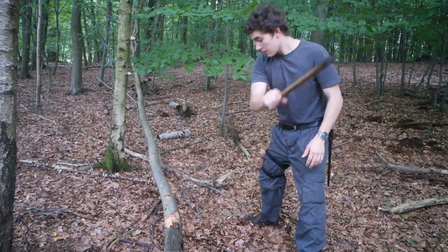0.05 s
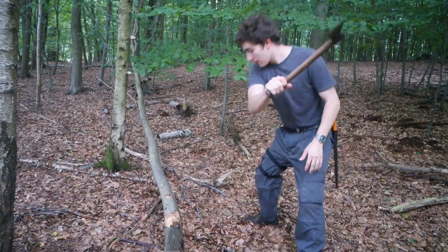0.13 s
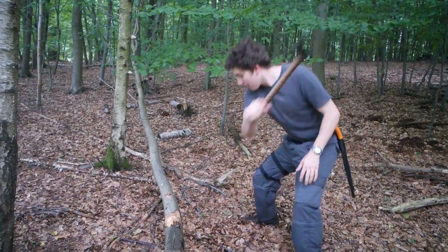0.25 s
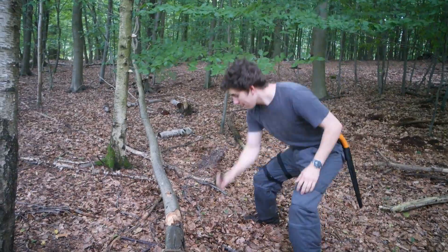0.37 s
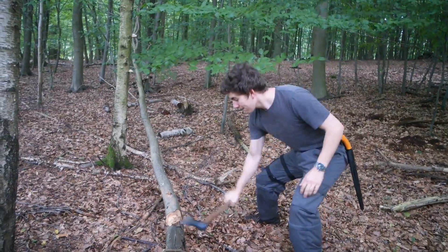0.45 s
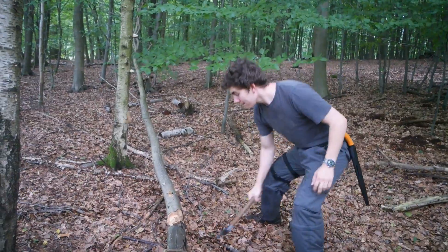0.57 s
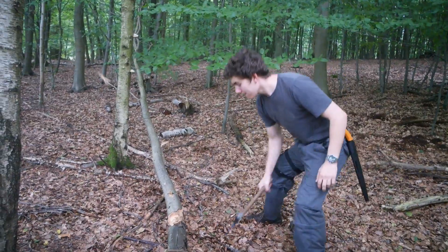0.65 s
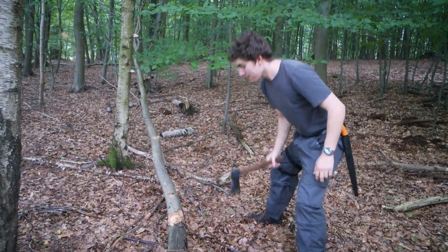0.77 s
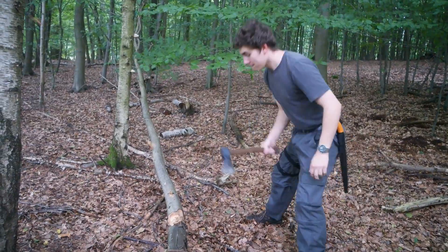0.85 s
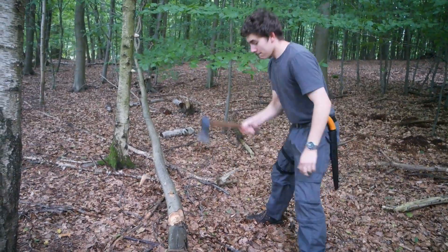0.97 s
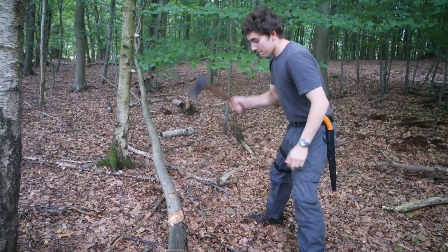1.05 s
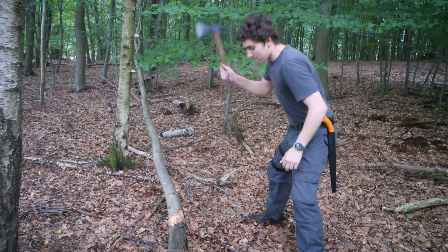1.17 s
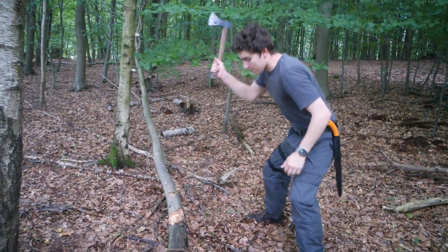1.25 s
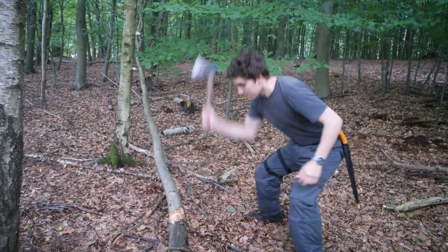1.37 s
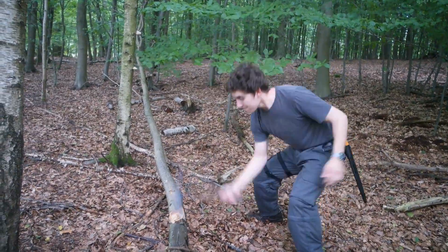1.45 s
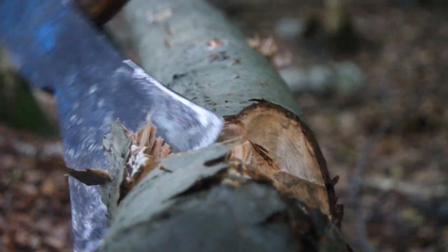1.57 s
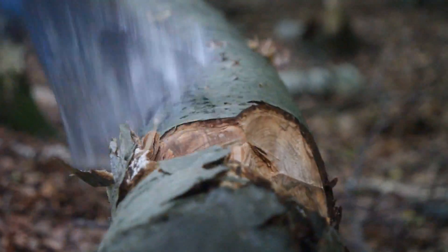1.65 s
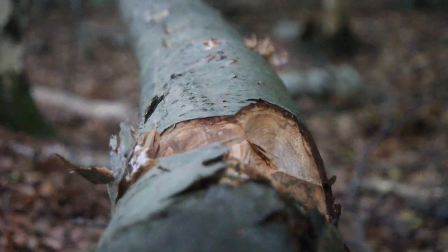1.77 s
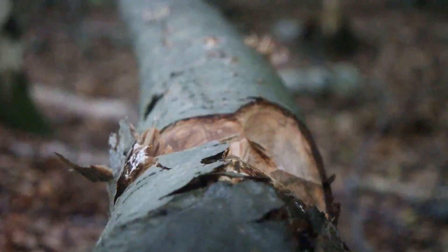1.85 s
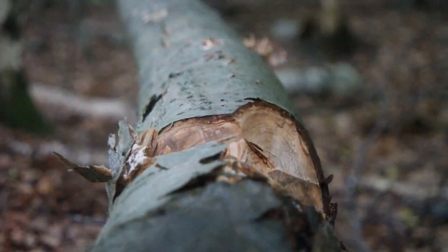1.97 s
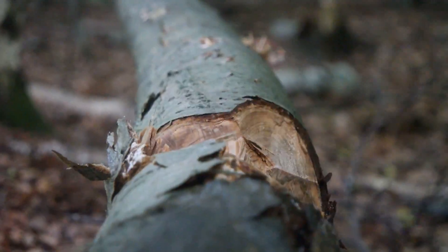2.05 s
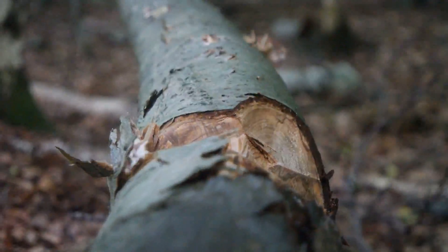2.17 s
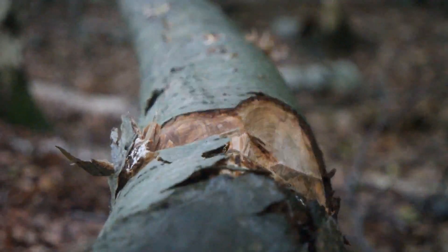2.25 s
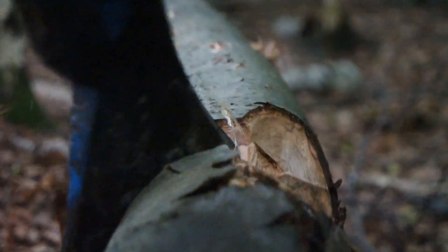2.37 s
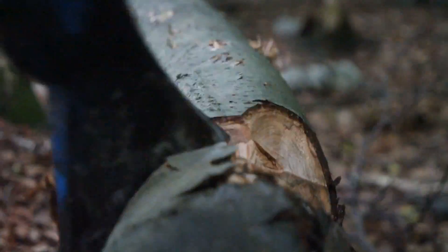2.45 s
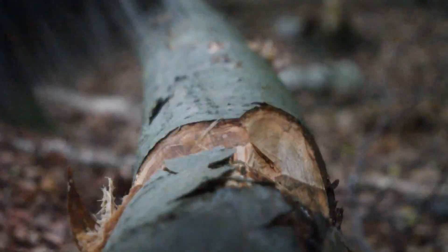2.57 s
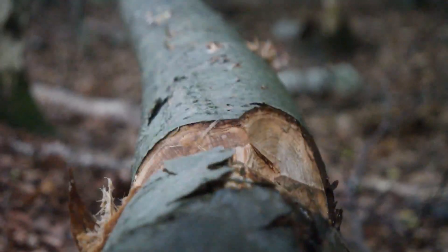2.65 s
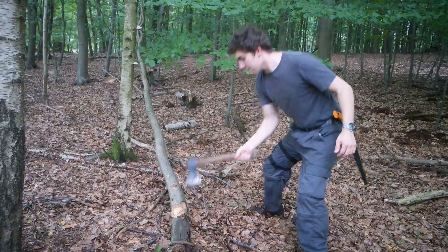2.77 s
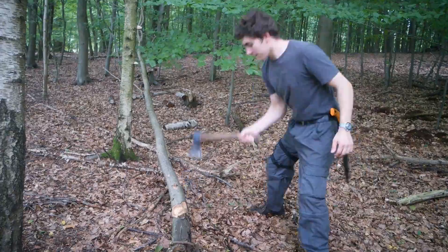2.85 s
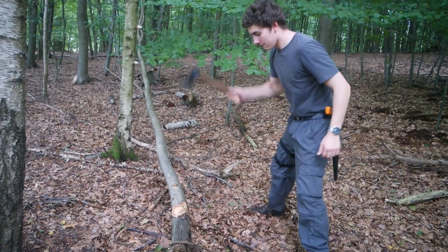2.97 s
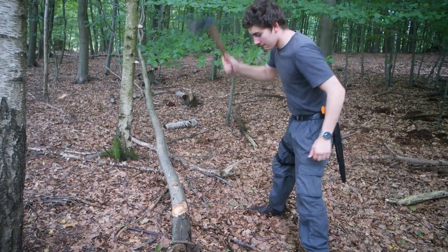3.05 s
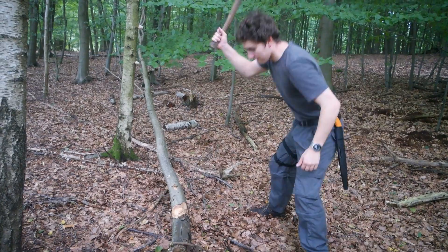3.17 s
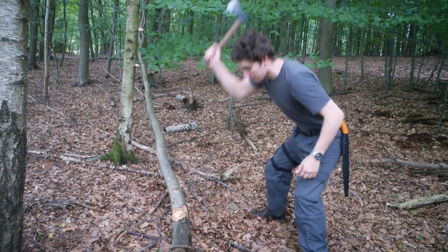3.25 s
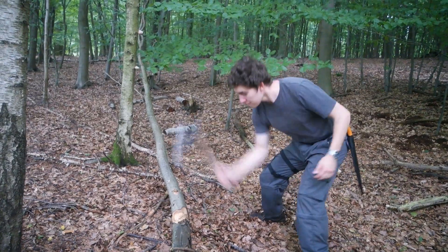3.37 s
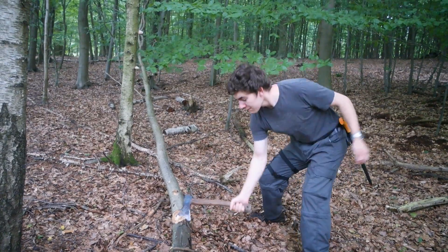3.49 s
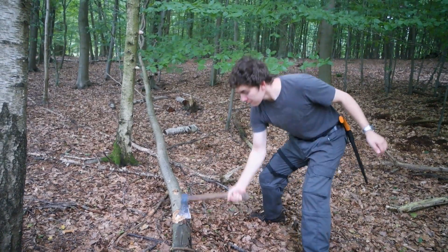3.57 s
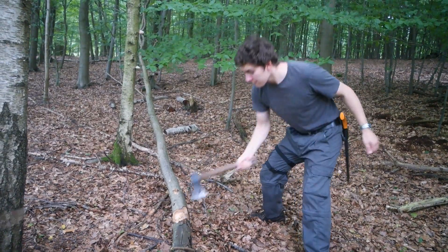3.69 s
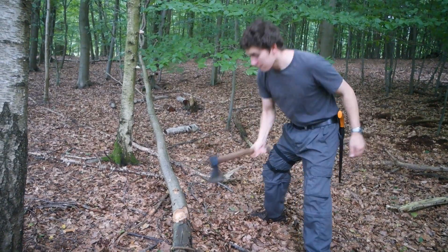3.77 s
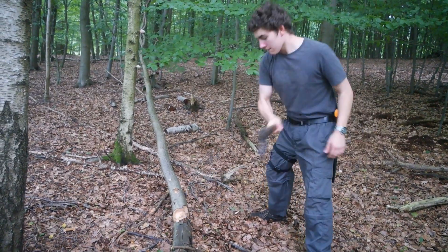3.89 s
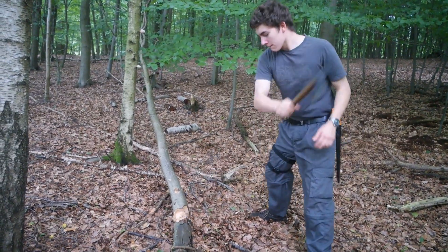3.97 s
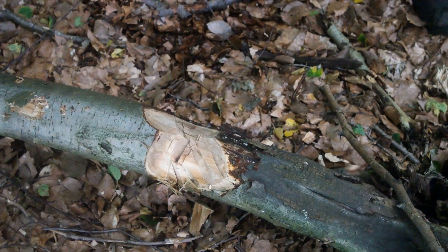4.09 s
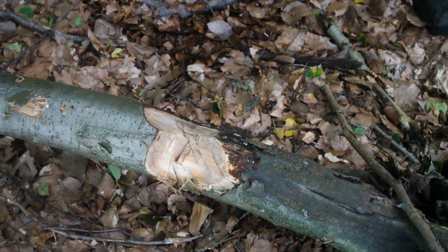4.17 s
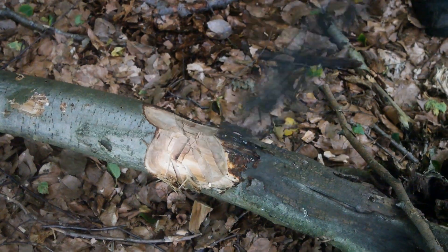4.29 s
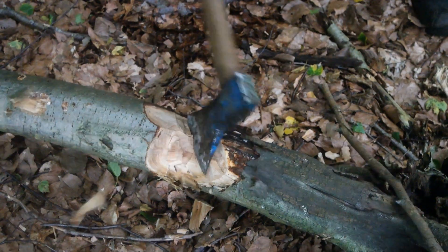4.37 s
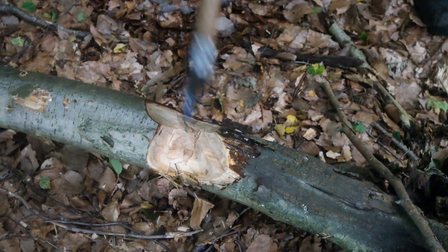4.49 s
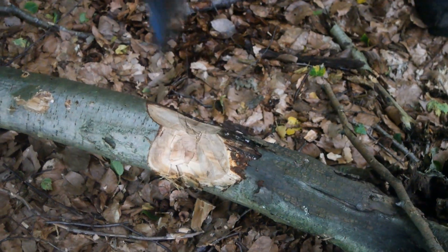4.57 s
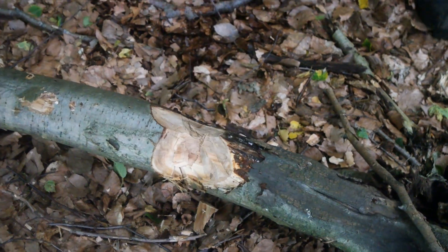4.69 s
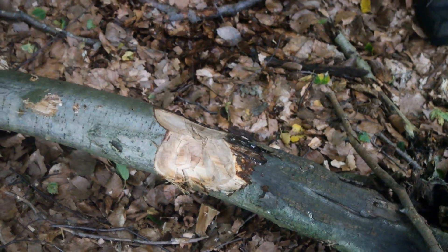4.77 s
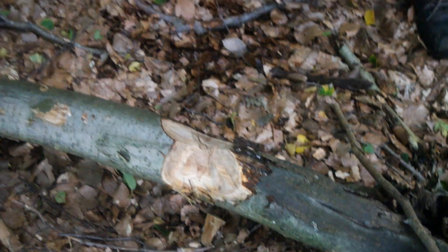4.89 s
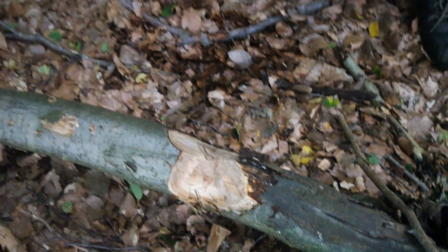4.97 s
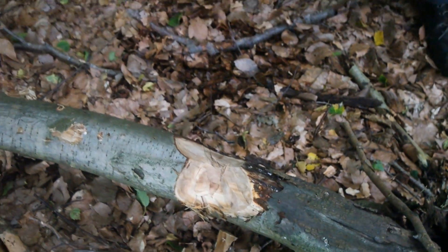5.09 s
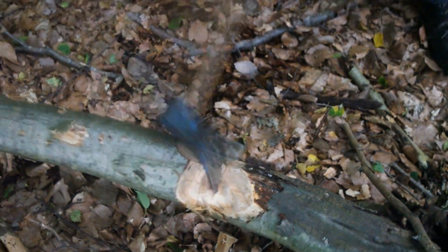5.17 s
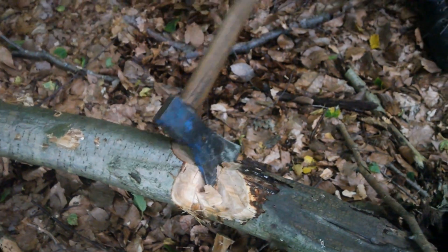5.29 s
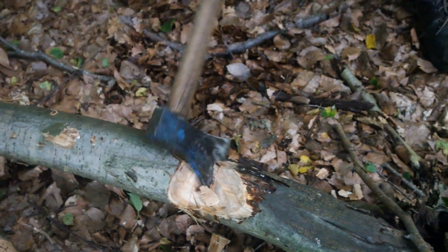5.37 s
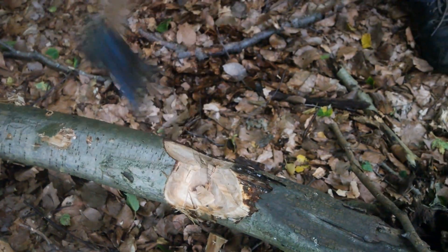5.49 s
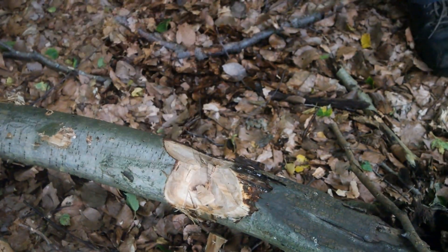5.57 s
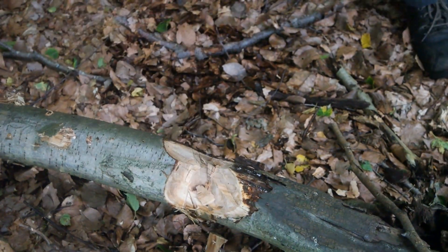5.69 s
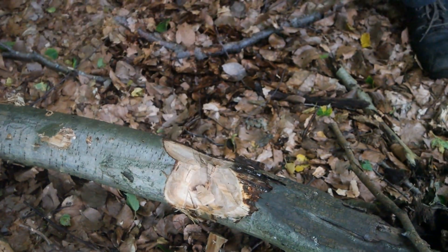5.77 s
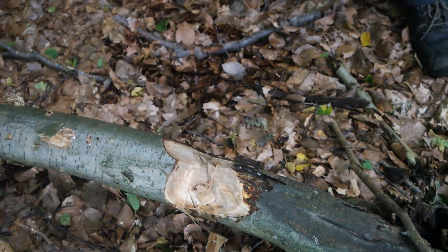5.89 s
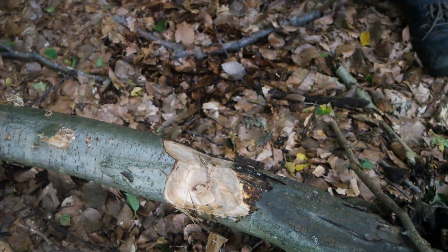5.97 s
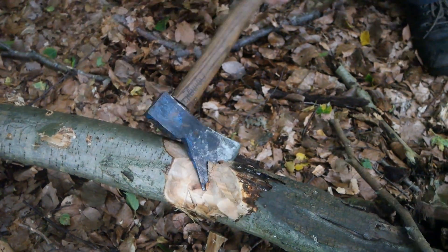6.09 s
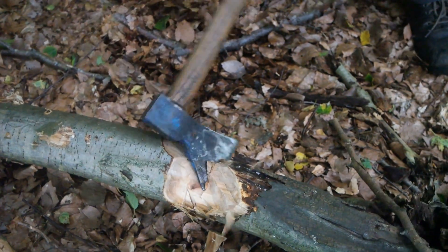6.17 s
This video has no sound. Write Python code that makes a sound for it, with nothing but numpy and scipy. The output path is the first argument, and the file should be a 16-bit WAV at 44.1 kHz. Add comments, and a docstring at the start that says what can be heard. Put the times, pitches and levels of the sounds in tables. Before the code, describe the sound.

A dry branch breaks close by at the very start, a quick cluster of snaps and crackle lasting about a tenth of a second. A hatchet then chops into a fallen log seven times, at about 0.6, 1.6, 2.6, 3.6, 4.5, 5.3 and 6.2 seconds, slightly right of centre. Each blow is a loud, short, splintering knock with a trace of steel ring, followed by a brief echo off the surrounding trunks. The last three knock a little deeper. Faint wooden knocks, chips landing on dry leaves and small cloth rustles come between blows, most clearly around 1.6 and 4.5 seconds. Behind is a quiet forest wash of leaves, distant air and thin hiss, rising before each blow and sinking after it. Soft, low wind puffs brush the microphone during the first three seconds. The sound ends right on the last chop.

```python
"""A hatchet bites seven times into a fallen log, heard from a stereo microphone in a quiet wood.
Each blow is a few milliseconds of tearing fibres that ring the steel head and the log; the trunks
around scatter it back. Small wooden knocks follow, chips land on dry leaves, and at the very start
a dry branch cracks close by. Behind are leaves, far air, hiss and a breeze on the microphone ports;
the level of this whole background rises before each blow and sinks after it."""
import sys
import numpy as np
from scipy import signal
from scipy.fft import rfft, irfft
from scipy.io import wavfile

SR = 44100
rng = np.random.default_rng(int(sys.argv[2]) if len(sys.argv) > 2 else 0)


def log_audio(samples):
    """Write samples as a 16-bit WAV file to the path given in sys.argv[1]."""
    # one column per channel
    frames = np.atleast_2d(samples).T
    # limit to full scale, then quantise
    limited = np.clip(frames, -1, 1)
    pcm = np.round(limited * 32767).astype(np.int16)
    wavfile.write(sys.argv[1], SR, pcm)


N = 275184
LOG_PAN_DB = -3   # every pan is left minus right: the log is louder on the right

# modes of the steel head, damped by the wood: f/Hz, level/dB, t60/s
HEAD_MODES = [(1850, 2.5, .012), (2500, -0.5, 0.035), (3000, -3, 0.018), (3570, -0.5, .009),
              (4500, -5, .009), (5100, -10, .009), (6580, -8.5, 0.019)]
def steel_head(push, tearing, t, bite_ms, cutoff_ms=5.3):
    """Tearing fibres shake the head; its ring cuts off just after the bite."""
    shake = push + .055 * tearing
    modes = sum(from_db(db) * rms_one(ring(shake, hz, t60)) * (-1) ** k
                for k, (hz, db, t60) in enumerate(HEAD_MODES))
    return modes * np.exp(-(t * 1000 / (bite_ms + cutoff_ms)) ** 3)


# modes of the fallen log: f/Hz, level/dB, t60/s
LOG_MODES = [(330, -3, .04), (430, 0, .05), (560, -3, .035), (735, 0, .04), (1040, -4, .022),
             (1250, -5, .018), (1900, -6, .016), (2500, -7, .014)]
def log_ring(push):
    """The log rings, its modes balanced differently at every blow."""
    return sum(from_db(db + rng.normal(0, 4)) * ring(push, hz, t60) * (-1) ** k
               for k, (hz, db, t60) in enumerate(LOG_MODES))


# returns along the log: mean delay/s, spread/s, low f/Hz, high f/Hz
LOG_RETURNS = [(.010, .005, 756, 1250), (0.02, .007, 502, 851), (0.022, .007, 370, 516.5)]
def bending_waves(t):
    """Bending waves come back along the log, high ones first, each a swell of noise."""
    for delay, spread, low, high in LOG_RETURNS:
        noise = rng.standard_normal(len(t))
        arrival = delay * rng.uniform(.76, 1.3)
        yield band(noise * np.exp(-((t - arrival) / spread) ** 2), low, high)


# blows at the log: t/s, rms level over the first 5 ms/dB, knock f/Hz, crack f/Hz, bite/ms;
# shares/dB of knock, crack, head, splinters, log ring, each return;
# echo level/dB, echo tilt/(dB per octave), echo emphasis f/Hz
BLOWS = [(0.582, -11.5, 850, 3090, 0.35, -1, -9, -4, -10.5, -27.5, -22, -44, 4, 2800),
         (1.6220, -10.5, 970, 1893, 2.5, -11.5, -3.5, -1, 2, -10, -21.5, -46.5, 2, 2500),
         (2.6274, -9, 1000, 2534, 3.2, -5, -5.5, -2, -7.5, -20.5, -25, -45, 3, 3546),
         (3.5647, -11, 800, 3410, 2.8, -5, -5.5, -14.5, -0.5, -9.5, -25, -49, 5, 3500),
         (4.4552, -9.5, 619, 1080, 3.2, -8.5, -7, -12.5, -1.5, -11.5, -25.5, -53.5, 2.5, 1402),
         (5.3209, -7.5, 620, 1050, 3.1, -2.5, -9, -12.5, 4.5, -15.5, -28, -55.5, 7.5, 3295),
         (6.1833, -8, 602, 2720, 5.6, -13, -15, -30, 5.5, -9, -26, -52.5, 8.5, 2960)]
def hatchet():
    """The edge lands and fibres tear for a few milliseconds; notch, head and log ring."""
    out, t = np.zeros((2, N)), np.arange(SR // 6) / SR
    for s, level_db, knock_hz, crack_hz, bite_ms, *shares, _, _, _ in BLOWS:
        knock_db, crack_db, head_db, splinter_db, log_db, return_db = shares
        # the level holds briefly, then drops abruptly, leaving only a faint crackle
        bite = np.exp(-(t * 1000 / bite_ms) ** 3) * np.minimum(t / .0005, 1)
        tearing = rng.standard_normal((3, len(t))) * (bite + .1 * np.exp(-t / .0087))
        tearing = tearing[0] + .86 * tearing[1:]   # shared by the ports, plus each port's own
        push = np.exp(-t / .00008) + .1 * tearing[0]
        parts = [(-22.5, coupled_ring(push, hz=335, t60=.011)),   # low thump
                 (crack_db, coupled_ring(push, crack_hz, t60=.0051)),
                 (knock_db, ring(push, knock_hz, t60=.0066)),   # the notch knocks at once
                 (head_db, steel_head(push, tearing, t, bite_ms)),
                 (splinter_db, band(tearing, 3300, 19000) + .4 * band(tearing, 5500, 8000)),
                 (log_db, log_ring(push))]
        parts += [(return_db, wave) for wave in bending_waves(t)]
        blow = sum(from_db(db) * rms_one(part) for db, part in parts)
        blow = band(band(blow, 240, 19500), 240, 19500)
        add(out, s, from_db(level_db) * blow / np.std(blow[:, :SR // 200]), LOG_PAN_DB)
    return out


def coupled_ring(push, hz, t60):
    """Blade and notch are coupled: a resonance applied twice swells before it dies."""
    return ring(ring(push, hz, t60), hz, t60)


# sound from all around, at the two ports: f/Hz, left-right likeness/0..1
DIFFUSE_LIKENESS = [(60, 0.29), (180, 0.31), (550, 0.96), (1650, 0.72), (4970, 0.13), (15000, 0.06)]
# scatter off the surrounding trunks: f/Hz, spectral level/dB, t60/s
TRUNK_SCATTER = [(250, -9, 0.2), (600, -0.5, .3), (1520, -4.5, 0.41), (2800, -3.5, 1), (4500, -1, 0.74),
                 (8000, 0, .3), (14000, -10, 0.37)]
def trunk_echoes():
    """Echoes of each blow off many trunks merge into noise that dies band by band."""
    out, t = np.zeros((2, N)), np.arange(int(.7 * SR)) / SR
    edges = 200 * 2. ** np.arange(0, 6.6, 1 / 3)
    for s, *_, echo_db, tilt_db, emphasis_hz in BLOWS:
        white, tail = rng.standard_normal((2, 3, len(t))), 0
        for k, (low, high) in enumerate(zip(edges, edges[1:])):
            hz = np.sqrt(low * high)
            alike = np.clip(at_hz(DIFFUSE_LIKENESS, hz), 0, 1)
            noise = np.sqrt(alike) * white[k % 2, 0] + np.sqrt(1 - alike) * white[k % 2, 1:]
            level_db = echo_db + at_hz(TRUNK_SCATTER, hz) + tilt_db * np.log2(hz / 2000)
            level_db += 7 * np.exp(-(np.log2(hz / emphasis_hz) / .5) ** 2)
            t60 = at_hz(TRUNK_SCATTER, hz, column=2)
            tail = tail + band(noise, low, high) * from_db(level_db - 60 * t / t60)
        add(out, s, tail * np.minimum(t / .016, 1), LOG_PAN_DB)
    return out


# snaps close to the microphone: t/s, peak level/dB, f/Hz, width/octaves
BRANCH_SNAPS = [(.004, -6.5, 2070, 1.35), (.0095, -11.5, 3808, 4), (0.022, -11, 3460, 5),
                (0.027, -20.5, 5050, 0.75), (.032, -13, 744, .7), (0.0315, -11.5, 9000, 2),
                (0.0499, -1, 4300, 0.89), (0.05, -3.5, 3770, 2)]
# the branch's crackle and its echo: t/s, level/dB, share of the woody low end/dB
BRANCH_CRACKLE = [(0, -22, -3.5), (.045, -22.5, -4), (.058, -30.5, -8.5), (.075, -40.5, -8),
                  (.115, -45.5, -10.5), (.131, -46, -10.5), (.135, -81, -9.5)]
def branch():
    """A dry branch breaks: sharp snaps over a dense crackle with a woody low end."""
    level_db, woody_db = in_time(BRANCH_CRACKLE)
    white = rng.standard_normal((3, N))
    white = white[0] + .3 * white[1:]
    bright = rms_one(band(white, 1700, 17000) + .8 * band(white, 2000, 5100))
    woody = from_db(woody_db) * rms_one(band(white, 230, 3000))
    decay_ms, pan_db = 2.1, -3.5
    snaps = bursts([(*snap, decay_ms, pan_db) for snap in BRANCH_SNAPS], apart=.14, rise_ms=.29)
    return snaps + from_db(level_db) * rms_one(bright + woody)


# knocks at the log: t/s, peak level/dB, f/Hz, width/octaves, decay/ms
WOOD_KNOCKS = [(1.697, -47, 920, 0.17, 15), (1.812, -46.5, 956, 0.45, 7.7), (3.642, -50.5, 935, 0.3, 15),
               (3.761, -52, 970, 0.18, 10), (4.49, -48, 500, 1.7, 87), (4.724, -51.5, 700, 1.4, 15),
               (5.403, -46.5, 584, 0.25, 13), (5.518, -44, 1190, 0.89, 10), (5.528, -46.5, 653, 0.76, 10.4),
               (6.191, -18.5, 1860, 0.27, 0.86)]
def wood_knocks(pan_db=-5):
    """Small wooden knocks after the blows, one longer low rumble and one sharp second crack."""
    return bursts([(*knock, pan_db) for knock in WOOD_KNOCKS], apart=.1, rise_ms=.92)


# chips and cloth, right of the microphone: t/s, peak level/dB, f/Hz, width/octaves, decay/ms
RUSTLES = [(0.4972, -35.5, 4970, 6.2, 5), (1.302, -35.5, 8160, 5.7, 42), (1.567, -27.5, 9600, 5.7, 18),
           (1.581, -27, 11800, 0.87, 24), (1.885, -43, 8800, 1.8, 3.9), (4.021, -47, 11470, 1.5, 16),
           (4.477, -47, 8830, 2, 9.9), (4.51, -48, 4480, 1, 3.6), (4.5217, -34, 4600, 1.5, 3),
           (4.528, -30.5, 4900, 1.4, 3.3), (4.561, -33, 3700, 1.8, 7.6), (4.72, -50, 8750, 1.6, 5.9),
           (4.768, -47, 5950, 6.6, 9.1), (4.778, -48, 10530, 0.76, 11), (5.07, -48.5, 9170, 2, 4),
           (5.552, -50.5, 6020, 1.4, 4.6), (5.61, -49, 11030, 1.6, 3.6), (5.84, -52, 10000, 3, 2.6),
           (6.065, -42, 8820, 3, 2)]
def chips_and_cloth(pan_db=-7):
    """Chips land on dry leaves and cloth rustles, in short bright bursts."""
    return bursts([(*rustle, pan_db) for rustle in RUSTLES], apart=.44, rise_ms=.98)


# the strongest puffs, right on the microphone: t/s, peak level/dB, pan/dB
WIND_PUFFS = [(.133, -50, -15), (.164, -44.5, -22.5), (.284, -38.5, -4), (.305, -38, 6), (.349, -46, -7),
              (.439, -48.5, -12.5), (1.267, -56, -14), (1.384, -44.5, -13), (1.425, -44, -11),
              (1.492, -41, 7.5), (2.464, -30.5, -6), (2.515, -38, -19), (2.559, -48.5, -14.5),
              (2.6, -42, -4)]
def wind_puffs(hz=171.1, octaves=1, decay_ms=18):
    """Puffs of wind hit the ports with low thuds, largely different in each."""
    rows = [(s, db, hz, octaves, decay_ms, pan_db) for s, db, pan_db in WIND_PUFFS]
    return bursts(rows, apart=2.2, rise_ms=6)


# wind rumble on the microphone: f/Hz, spectral level/dB
BREEZE_SPECTRUM = [(15, -50), (25, -23), (108, -2.5), (151, -4), (256, -4.5), (334, -10.5), (377, -22.5),
                   (600, -18), (780, -42), (1320, -120)]
# its floor between swells: t/s, level/dB
BREEZE_LULL = [(0, -74), (2.2, -70.5), (4.1, -76.5), (4.7, -94.5), (6.24, -86)]
def breeze():
    """Moving air brushes each port separately: a fluttering rumble, stronger on the right."""
    lull = from_db(in_time(BREEZE_LULL)[0])
    gain = np.hypot(swell(column=3, rise_db_per_s=39.5, sink_db_per_s=116.5), lull)
    rumble = banded_noise(BREEZE_SPECTRUM, flicker_db=4.5, likeness=[(20, .05), (600, .02)])
    return pan(gain * rumble, -6)


# leaves and distant air in the wood: f/Hz, spectral level/dB
AIR_SPECTRUM = [(24, -61), (40, -31.5), (223, -13), (290, -1), (579, -10.5), (890, -2), (1050, -12),
                (1540, -7), (5330, -14), (12000, -17.5), (15600, -40.5), (22000, -120)]
def far_air():
    """Leaves and far air blend into a broad, soft wash."""
    wash = banded_noise(AIR_SPECTRUM, flicker_db=.7, likeness=DIFFUSE_LIKENESS)
    return pan(swell(column=1, rise_db_per_s=33, sink_db_per_s=35) * wash, -2.4)


# faint hiss behind everything: f/Hz, spectral level/dB
HISS_SPECTRUM = [(1500, -18), (3000, 2.5), (6000, -12), (10000, -1), (14000, 6.5), (17000, -8.5)]
def hiss():
    """A smooth, high hiss, almost unrelated between left and right."""
    noise = banded_noise(HISS_SPECTRUM, flicker_db=.15, likeness=[(100, .02), (16000, .02)])
    return swell(column=2, rise_db_per_s=26.5, sink_db_per_s=42) * noise


# crests of the background level, one a blow: t/s, air level/dB, hiss level/dB, breeze level/dB
CRESTS = [(.27, -52, -62.5, -52), (1.302, -51.5, -61, -54.5), (2.42, -51, -59, -53.5),
          (3.521, -55, -64, -71), (4.401, -57, -67, -69), (5.299, -58.5, -66, -81.5),
          (6.2, -58, -69.5, -84.5)]
def swell(column, rise_db_per_s, sink_db_per_s):
    """Gain of one background layer: it rises to each crest, holds until the blow lands, then sinks."""
    t, power = np.arange(N) / SR, 0
    for crest, blow in zip(CRESTS, BLOWS):
        before, after = np.maximum(crest[0] - t, 0), np.maximum(t - blow[0], 0)
        power += from_db(crest[column] - rise_db_per_s * before - sink_db_per_s * after) ** 2
    return np.sqrt(power)


def bursts(rows, apart, rise_ms):
    """Grainy bursts of band noise; apart weights each port's own noise against the shared noise."""
    out, t = np.zeros((2, N)), np.arange(SR // 8) / SR
    for s, peak_db, hz, octaves, decay_ms, pan_db in rows:
        grains = rng.standard_normal((3, len(t))) * rng.exponential(1, len(t)) ** .5
        envelope = np.exp(-t * 1000 / decay_ms) * np.minimum(t * 1000 / rise_ms, 1)
        burst = (grains[0] + apart * grains[1:]) * envelope
        burst = band(burst, hz * 2 ** (-octaves / 2), hz * 2 ** (octaves / 2))
        add(out, s, from_db(peak_db) * burst / np.abs(burst).max(), pan_db)
    return out


def banded_noise(spectrum, flicker_db, likeness):
    """Half-octave bands of stereo noise, each with its own level, flicker and likeness; rms 1."""
    out, together, edges = 0, drift(3), 25 * 2 ** np.arange(0, 9.6, .5)
    white = rng.standard_normal((2, 2, N))
    for k, (low, high) in enumerate(zip(edges, edges[1:])):
        hz = np.sqrt(low * high)
        if spectrum[0][0] < hz < spectrum[-1][0]:
            mid, side = band(white[k % 2], low, high)
            alike = np.clip(at_hz(likeness, hz), -1, 1)
            gain = from_db(at_hz(spectrum, hz) + flicker_db * (.6 * together + drift(32)))
            out = out + gain * (np.sqrt(1 + alike) * mid + np.sqrt(1 - alike) * side * [[1], [-1]])
    return rms_one(out)


def drift(rate_hz):
    """A slow random wander of rms about 1."""
    r = np.exp(-80 * np.pi * rate_hz / SR)
    slow = signal.lfilter([1], [1, -2 * r, r * r], rng.standard_normal(N // 40 + 2002))[2000:]
    return np.interp(np.arange(N) / 40, np.arange(len(slow)), rms_one(slow))


def ring(clicks, hz, t60):
    """A unit click sets a sine of height 1 ringing."""
    r, w = from_db(-60 / (t60 * SR)), 2 * np.pi * hz / SR
    return signal.lfilter([0, np.sin(w)], [1, -2 * r * np.cos(w), r * r], clicks)


def band(x, low_hz, high_hz):
    """Butterworth band-pass."""
    sos = signal.butter(2, [low_hz, min(high_hz, .45 * SR)], "band", fs=SR, output="sos")
    return signal.sosfilt(sos, x)


def from_db(db):
    """Decibels to gain."""
    return 10 ** (np.asarray(db) / 20)


def rms_one(x):
    """Scale to rms 1."""
    return x / np.sqrt(np.mean(x ** 2) + 1e-20)


def in_time(rows):
    """Each column of a curve, sample by sample."""
    s, *columns = np.transpose(rows)
    return [np.interp(np.arange(N) / SR, s, c) for c in columns]


def at_hz(points, hz, column=1):
    """A column of a spectrum table read on a log-frequency axis."""
    return np.interp(np.log(hz), np.log(np.array(points)[:, 0]), np.array(points)[:, column])


def pan(sound, pan_db):
    """Set the left channel pan_db above the right."""
    return sound * from_db([[pan_db / 2], [-pan_db / 2]])


def add(out, s, sound, pan_db):
    """Mix in a panned sound at s seconds."""
    i = round(s * SR)
    out[:, i:i + sound.shape[-1]] += pan(sound, pan_db)[:, :N - i]


def at_ports(near, lag_s=2.3e-5, shadow_hz=12500):
    """The right port hears near sounds a little later and is shaded in the top treble."""
    hz = np.fft.rfftfreq(N, 1 / SR)
    response = np.exp(-2j * np.pi * hz * lag_s) / np.sqrt(1 + (hz / shadow_hz) ** 6)
    return np.array([near[0], irfft(rfft(near[1]) * response, N)])


def scene():
    """Everything as it reaches the two microphone ports."""
    after_branch = np.arange(N) / SR > .133   # the background enters as the crackle ends
    background = (far_air() + hiss() + breeze()) * after_branch
    small_sounds = wood_knocks() + chips_and_cloth()
    puffs = wind_puffs()
    return at_ports(hatchet() + small_sounds + branch()) + trunk_echoes() + puffs + background


def record(dry):
    """Peaks overload, and a steep low-pass cuts the top."""
    clipped = np.clip(dry, -.88, .88)
    return signal.sosfilt(signal.cheby2(18, 70, 16900, fs=SR, output="sos"), clipped)


dry = scene()
out = record(dry)
log_audio(out)
```